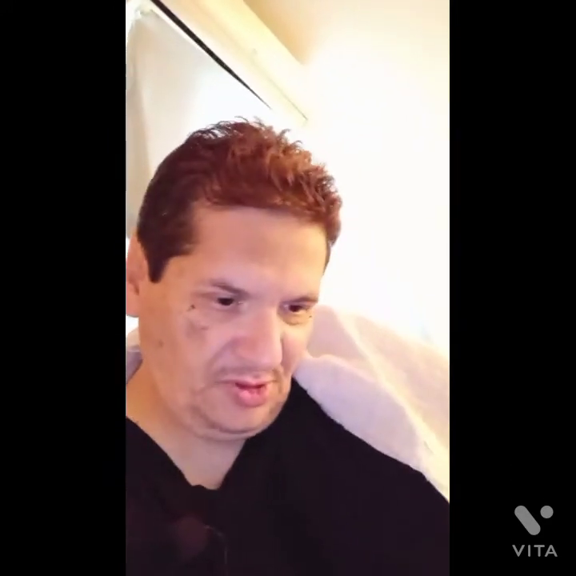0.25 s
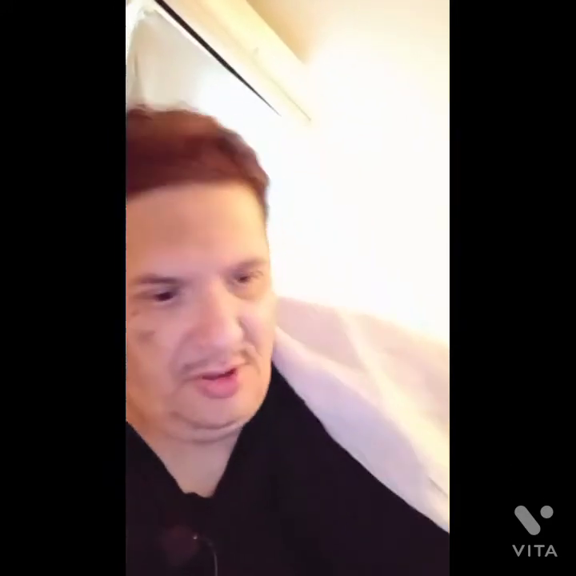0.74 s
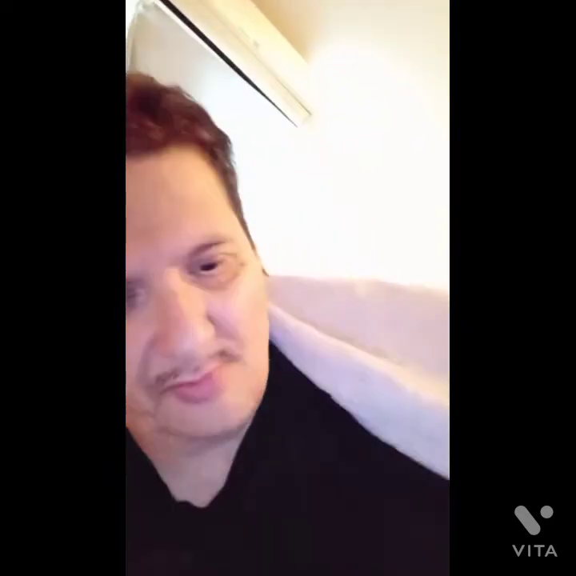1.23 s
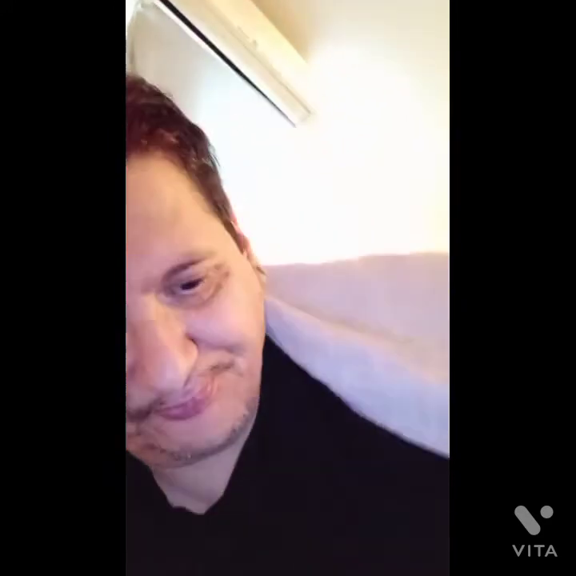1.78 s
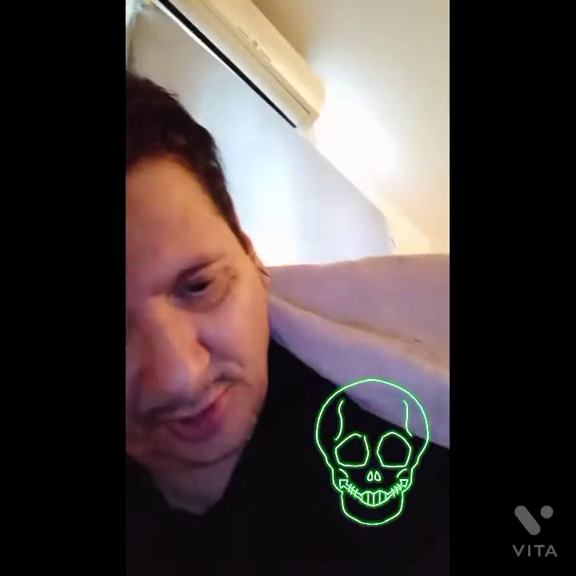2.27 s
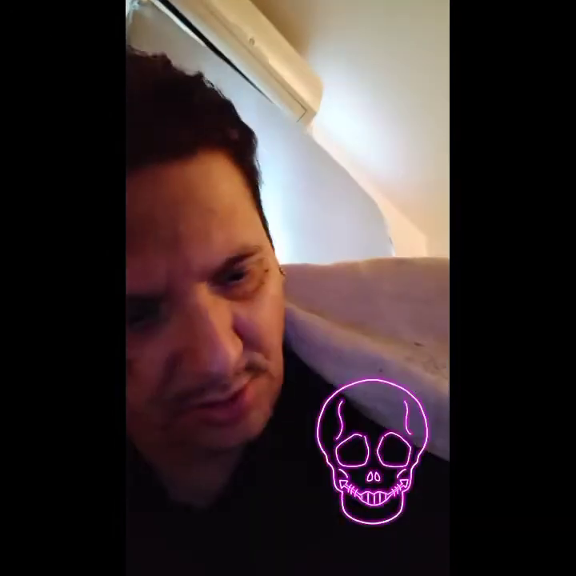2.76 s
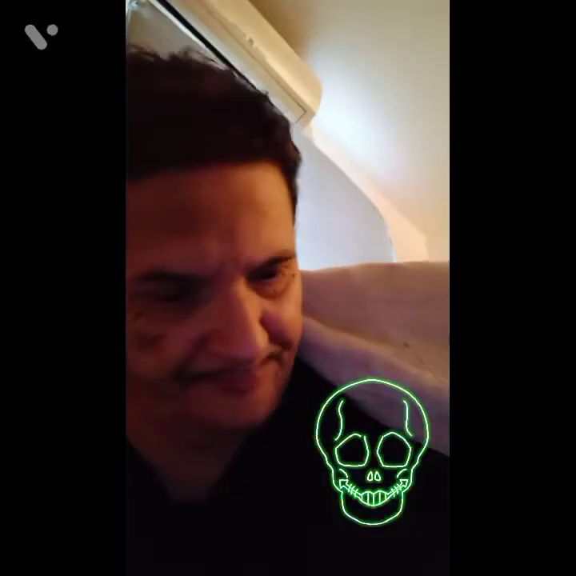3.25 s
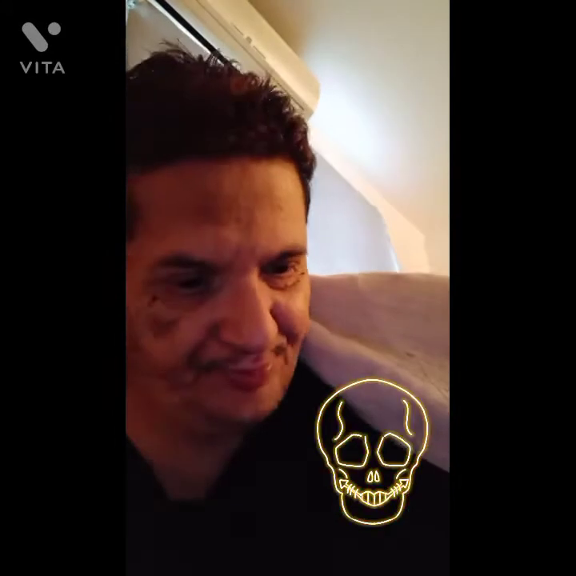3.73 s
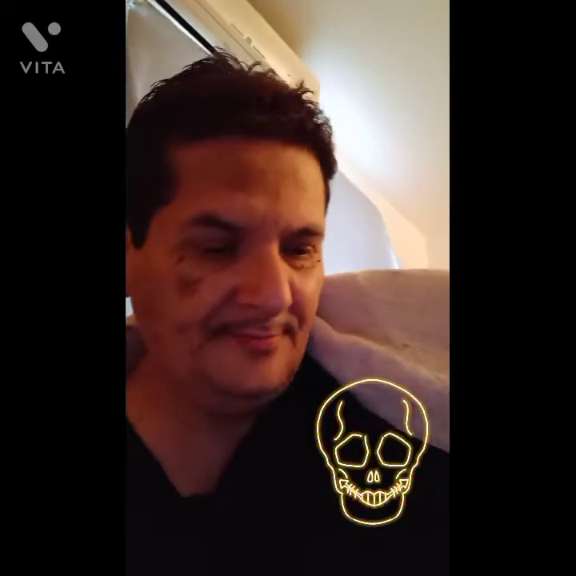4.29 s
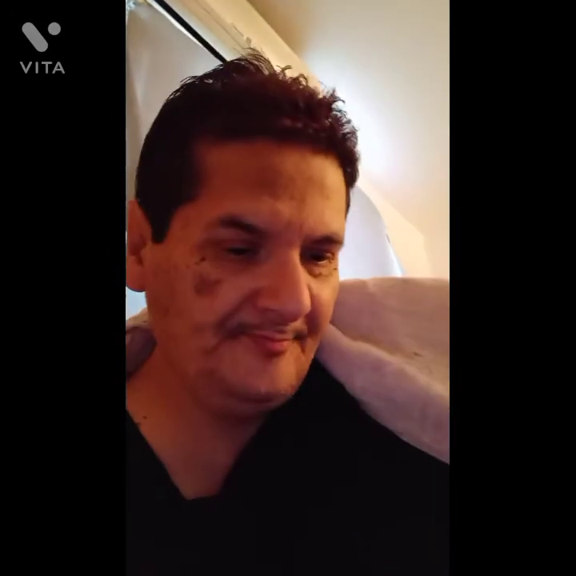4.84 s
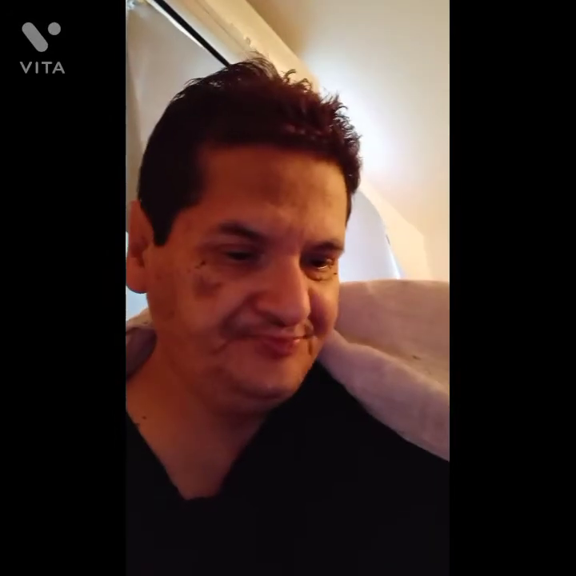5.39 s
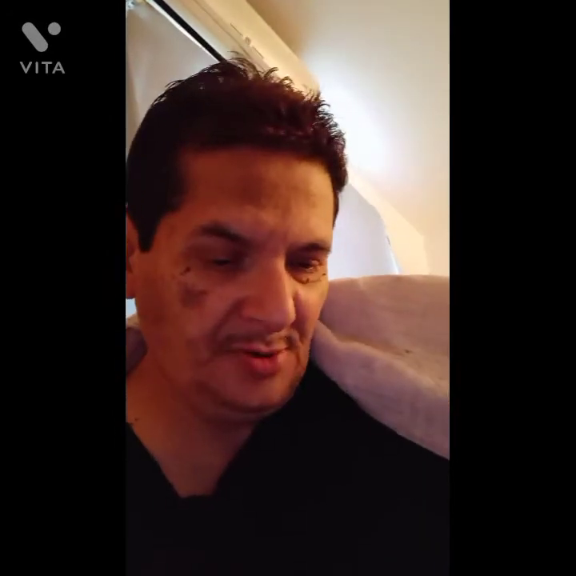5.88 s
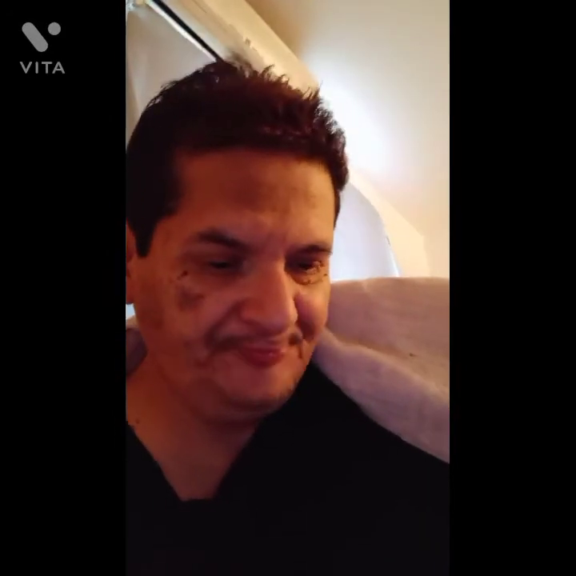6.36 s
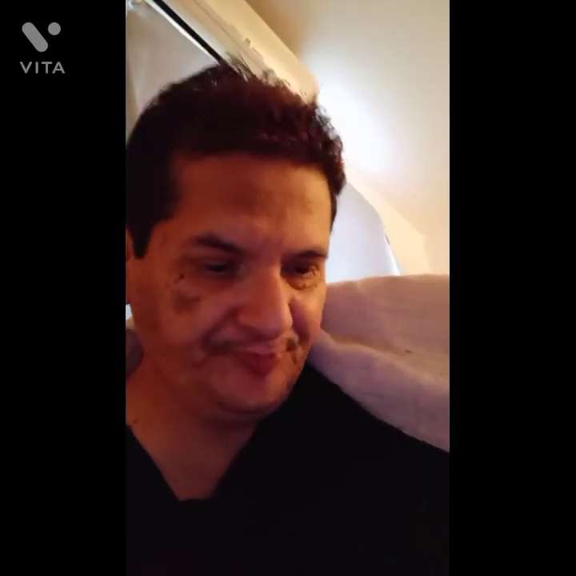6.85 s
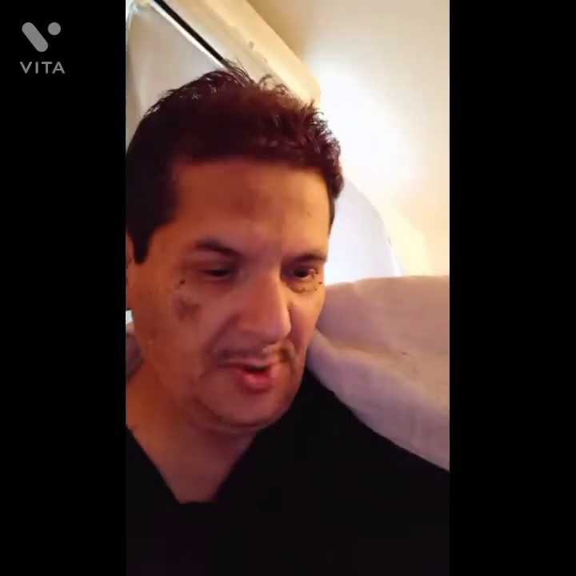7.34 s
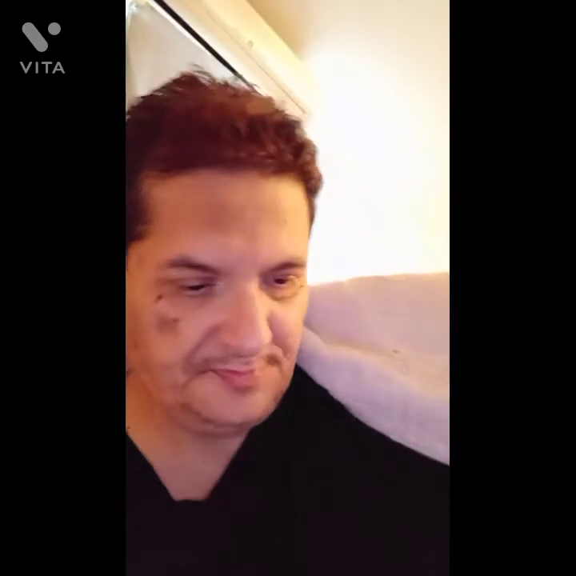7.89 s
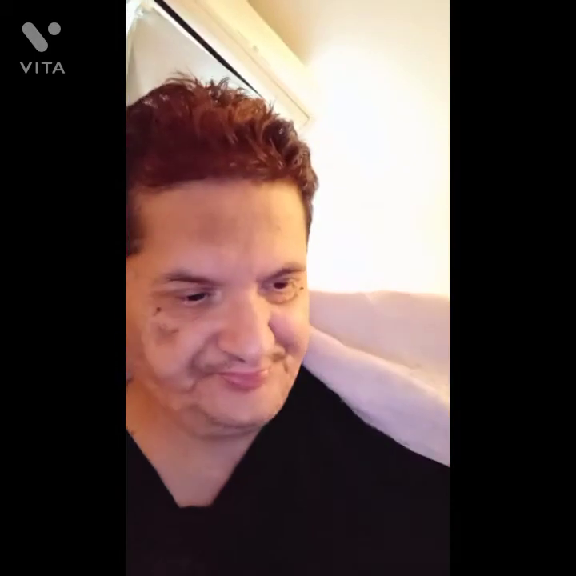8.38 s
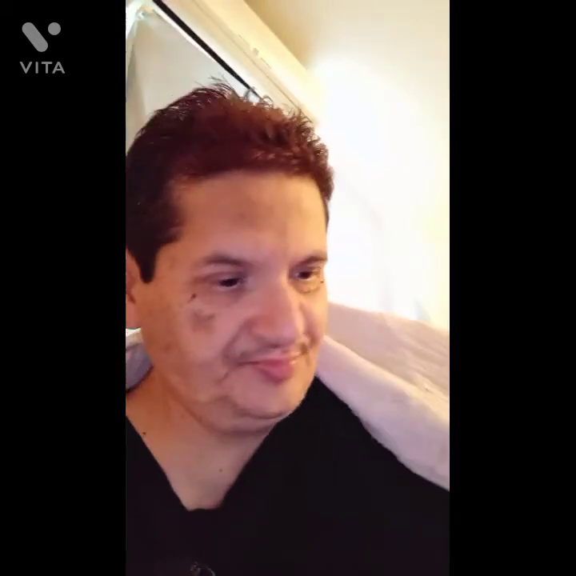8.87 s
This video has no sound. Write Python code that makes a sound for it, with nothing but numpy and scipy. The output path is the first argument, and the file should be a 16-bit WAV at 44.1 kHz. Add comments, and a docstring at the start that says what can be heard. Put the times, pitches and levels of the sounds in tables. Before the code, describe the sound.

A paper envelope is handled and torn open close up, with dry rustles, sharp crease snaps, short fibrous rips and dull finger pops.

```python
"""Tearing open a paper envelope

A paper envelope is torn open by hand, close to a microphone in a quiet, soft room.
Sheets slide and rustle: shaped noise with tiny catches, plus small wrinkles that ring briefly.
Creases snap as short coloured pushes, and the seam rips as bursts of breaking fibres.
Fingers bump the envelope with dull pops, and gliding bands of noise make it sound hollow.
A thin tone whistles in one pause; still air and a short room tail lie behind it all."""
import sys
import numpy as np
from scipy import signal
from scipy.fft import rfft, irfft, next_fast_len
from scipy.io import wavfile
from scipy.ndimage import map_coordinates

SR = 44100
rng = np.random.default_rng(int(sys.argv[2]) if len(sys.argv) > 2 else 0)


def store_pcm(level_fs):
    """Save levels as 16-bit WAV."""
    pcm = np.round(np.clip(level_fs, -1, 1) * 32767).astype(np.int16)
    wavfile.write(sys.argv[1], SR, np.atleast_2d(pcm).T)


N = 402633  # length in samples


def amp(db):
    """Turn decibels into a plain multiplier."""
    return 10 ** (np.asarray(db) / 20)


def unit(x):
    """Scale to rms 1."""
    return x / np.sqrt(np.mean(x ** 2) + 1e-20)


def along(points, hz):
    """Read (Hz, value) points at any frequency, on a log axis."""
    f, v = np.transpose(points)
    return np.interp(np.log(hz + 1), np.log(f + 1), v)


def curves(rows):
    """One value per sample for each column after the time."""
    s, *cols = np.transpose(rows)
    return [np.interp(np.arange(N) / SR, s, c) for c in cols]


def wobble(rate):
    """A smooth random curve through `rate` random points a second."""
    points = rng.standard_normal(int(N * rate / SR) + 4)
    return map_coordinates(points, [np.arange(N) * rate / SR])


def add(track, s, sound):
    """Mix a sound into the track at time s."""
    room_left = track[max(0, round(s * SR)):][:len(sound)]
    room_left += sound[:len(room_left)]


def ring(spectrum, size=4096):
    """How a body with this spectrum answers one tap: nothing before the tap, total energy 1."""
    cepstrum = irfft(np.log(amp(along(spectrum, np.fft.rfftfreq(size, 1 / SR)))))
    # folding the second half onto the first puts the whole answer after the tap
    cepstrum[1:size // 2] *= 2
    cepstrum[size // 2 + 1:] = 0
    response = irfft(np.exp(rfft(cepstrum)))
    return response / np.linalg.norm(response)


def coloured(x, spectrum):
    """Sound x through a body with this spectrum."""
    return signal.fftconvolve(x, ring(spectrum))[:len(x)]


def filtered(x, gain):
    """Multiply x by a gain that depends on frequency."""
    m = next_fast_len(N + SR // 2)
    return irfft(rfft(x, m) * gain(np.fft.rfftfreq(m, 1 / SR)), m)[..., :N]


def breaks(rate, spread_db, size):
    """Clicks at random moments, about `rate` a second, of uneven strength and either sign."""
    strength = amp(spread_db * np.clip(rng.standard_normal(size), -2, 2))
    happens = rng.random(size) < rate / SR
    return happens * strength * rng.choice([-1, 1], size)


def friction(spectrum, rate, spread_db, smooth_db, flutter_db, grip=1):
    """Tiny catches over a smooth rub; a light grip hardly catches at all; rms 1."""
    catches = grip * unit(breaks(rate, spread_db, size=N))
    rub = amp(smooth_db) * rng.standard_normal(N)
    flutter = amp(flutter_db * wobble(60))
    return unit(coloured((catches + rub) * flutter, spectrum))


def shifting_colour(x, width_hz, life_s, depth_db):
    """The colour shifts: random patches of pitch and time grow louder and softer; rms 1."""
    hz, t, z = signal.stft(x, SR, nperseg=1024, noverlap=896)
    row, col = np.meshgrid(hz / width_hz, t / life_s, indexing="ij")
    knots = rng.standard_normal((int(row.max()) + 2, int(col.max()) + 2))
    field = np.clip(map_coordinates(knots, [row, col], order=1), -1.5, 1.5)
    patchy = signal.istft(z * amp(depth_db * field), SR, nperseg=1024, noverlap=896)[1]
    return unit(patchy[:N])


def buckle(t, scatter, t60):
    """One sharp push and the quickly dying shudder after it."""
    push = scatter * rng.standard_normal(len(t)) * amp(-60 * t / t60)
    push[0] = 1
    return push


# tone of the still air: f/Hz, level/dB (per Hz, relative)
AIR_SPECTRUM = [(80, -20.5), (220, 5), (450, -12), (1150, -12), (1280, 17.5), (1500, -22.5), (2050, 1.5),
                (2500, -23.5), (3400, -28), (6500, 2.5), (8600, -13), (9900, 0.5), (11500, -33)]


def still_air(db):
    """A faint steady noise, coloured like the quiet air."""
    return amp(db) * coloured(rng.standard_normal(N), AIR_SPECTRUM)


# light contact, as the sheets never quite rest except for one short pause:
# t/s, hiss level/dB (before the trim in scene)
LIGHT_CONTACT = [(0, -67.5), (0.5, -60), (0.7, -65), (0.9, -62), (1.0, -81), (1.07, -96), (1.2, -63.5),
                 (1.45, -61), (1.53, -55.5), (1.85, -61.5), (2.1, -65), (2.5, -60), (3.4, -56), (4.1, -62),
                 (6.6, -59.5), (6.75, -68.5), (6.95, -71), (7.04, -61), (7.4, -57.5), (7.78, -65),
                 (8.28, -64), (8.57, -62), (8.73, -64), (9.13, -55.5)]
# the hands slide one sheet over another: start t/s, end t/s,
# hiss level/dB, mid rustle level/dB (before the trims in scene)
STROKES = [(0.027, 0.076, -52, -67), (0.346, 0.398, -49, -69), (0.554, 0.624, -54.5, -62),
           (0.744, 0.867, -50, -53), (1.088, 1.12, -49, -49), (1.157, 1.22, -51, -56),
           (1.3, 1.36, -52, -59), (1.58, 1.78, -52.5, -58), (1.928, 2.008, -56, -57.5),
           (2.301, 2.419, -54.5, -57), (2.578, 2.722, -55, -59), (2.786, 2.927, -48.5, -52.5),
           (3, 3.135, -48, -54), (3.59, 3.75, -54.5, -57), (3.828, 4.035, -52, -56.5),
           (4.134, 4.161, -46.5, -55), (4.332, 4.486, -50, -53), (4.525, 4.599, -49.5, -59),
           (4.669, 4.715, -47, -51.5), (4.783, 4.981, -50, -54), (5.04, 5.41, -56.5, -62),
           (5.434, 5.491, -52, -59), (5.55, 5.679, -51, -53.5), (5.769, 5.918, -56, -64.5),
           (5.95, 6.075, -52, -58.5), (6.09, 6.221, -47.5, -59), (6.356, 6.566, -46, -54.5),
           (6.644, 6.694, -44.5, -52.5), (6.777, 6.958, -53, -56.5), (7.453, 7.568, -50, -53.5),
           (7.624, 7.695, -52.5, -54.5), (7.833, 8.047, -50, -58.5), (8.087, 8.2, -48.5, -50)]
STROKE_ATTACK_S, STROKE_RELEASE_S = 0.0082, 0.014  # time for a stroke's speed to change by a factor e
STROKE_ARCH_DB = 1.5  # a stroke is fastest, and loudest, in its middle
TOUCH_MID_DB = -4.5  # mid rustle against hiss in the lightest contact


def sliding():
    """Levels in dB of hiss and mid rustle: every stroke builds, arches and dies over the light contact."""
    t = np.arange(N) / SR
    touch, = curves(LIGHT_CONTACT)
    hiss_power, mid_power = amp(touch) ** 2, amp(touch + TOUCH_MID_DB) ** 2
    for start, end, hiss_db, mid_db in STROKES:
        near = slice(*np.searchsorted(t, [start - .2, end + .2]))
        before = np.maximum(start - t[near], 0) / STROKE_ATTACK_S
        after = np.maximum(t[near] - end, 0) / STROKE_RELEASE_S
        arch = np.sin(np.pi * np.clip((t[near] - start) / (end - start), 0, 1)) - 1
        speed = np.exp(-before - after) * amp(STROKE_ARCH_DB * arch)
        hiss_power[near] += (amp(hiss_db) * speed) ** 2
        mid_power[near] += (amp(mid_db) * speed) ** 2
    return 10 * np.log10(hiss_power), 10 * np.log10(mid_power)


# how far a stroke bends the envelope: t/s, level/dB (added to the flexing of a firm stroke)
BEND = [(0, -21.5), (0.5, -23), (0.7, 10), (2.6, -2), (4.6, -11.5), (4.85, 2.5), (5.8, 2.5), (6.1, -8),
        (8.6, -6)]
# hiss of a firm stroke, the flexing it causes before BEND, dB of flexing per dB of hiss
FIRM_DB, FIRM_FLEX_DB, FLEX_GROWTH = -48, -64.5, 1.45
BUMP_FLEX_DB, SNAP_FLEX_DB = -27, -51  # flexing against a bump's level or a snap's knock level
FLEX_SETTLE_S = 0.052  # the envelope settles by a factor e in this time


def flexing(hiss_level):
    """Level in dB of the flexing: firm strokes bend the envelope, and it settles after each bump and snap."""
    bend, = curves(BEND)
    power = amp(FIRM_FLEX_DB + bend + FLEX_GROWTH * (hiss_level - FIRM_DB)) ** 2
    settle = np.exp(-np.arange(SR // 2) / SR / FLEX_SETTLE_S)
    for events, flex_db in ((BUMPS, BUMP_FLEX_DB), (SNAPS, SNAP_FLEX_DB)):
        for s, db, *_ in events:
            add(power, s, (amp(db + flex_db) * settle) ** 2)
    return 10 * np.log10(power)


# tones of the rustle, each f/Hz, level/dB (per Hz, relative):
# sliding hiss, mid rustle in loud strokes, mid rustle in quiet passages, flexing envelope
HISS = [(2500, -56), (3300, -26), (4600, -19), (5800, -8), (6600, 2), (7300, -7), (8300, -24.5),
        (10000, -25), (11500, -38.5), (14000, -52.5)]
LOUD_RUSTLE = [(300, -10), (900, -10.5), (1350, 3), (2100, 7), (2850, -1.5), (3600, 2.5), (4300, 8),
               (5300, 0), (8000, -12), (12000, -36.5)]
QUIET_RUSTLE = [(300, -17.5), (900, -26.5), (1350, -2.5), (2050, 9.5), (2700, -8), (3300, -14.5),
                (3750, 7.5), (4500, 11.5), (5400, -3), (8000, -27), (12000, -51.5)]
PANEL = [(25, -50.5), (70, 4.5), (130, -1), (250, 4.5), (450, -15.5), (750, -7.5), (1300, -41), (3000, -63)]
LOUD_MID_DB, LOUD_RANGE_DB = -59, 1  # mid level where quiet and loud tones meet, and how gradually
UNEVEN_DB, UNEVEN_PER_S = 2.2, 22  # the grip tightens and slackens: depth, changes per s


def rustle(hiss_level, mid_level, hiss_db, mid_db, flex_db):
    """A hiss, a mid rustle (full when loud, with a gap near 3 kHz when quiet), and flexing underneath."""
    flex_level = flexing(hiss_level)
    grip = np.minimum(amp((hiss_level - FIRM_DB) / 2), 1)
    hiss = friction(HISS, rate=500, spread_db=7, smooth_db=-2, flutter_db=2, grip=grip)
    # fade between the two mid tones by level
    loudness = .5 + .5 * np.tanh((mid_level - LOUD_MID_DB) / (2 * LOUD_RANGE_DB))
    loud = friction(LOUD_RUSTLE, rate=700, spread_db=6, smooth_db=-1, flutter_db=2.5)
    quiet = friction(QUIET_RUSTLE, rate=1500, spread_db=4, smooth_db=0, flutter_db=3)
    mid = np.sqrt(loudness) * loud + np.sqrt(1 - loudness) * quiet
    flex = friction(PANEL, rate=270, spread_db=4, smooth_db=2, flutter_db=2.0)
    hiss = shifting_colour(hiss, width_hz=600, life_s=.04, depth_db=3.5)
    mid = shifting_colour(mid, width_hz=380, life_s=.06, depth_db=6.5)
    flex = shifting_colour(flex, width_hz=110, life_s=.09, depth_db=8)
    layers = ((hiss_level + hiss_db, hiss), (mid_level + mid_db, mid), (flex_level + flex_db, flex))
    return sum(amp(level + UNEVEN_DB * wobble(UNEVEN_PER_S)) * sound for level, sound in layers)


# kinds of small wrinkle: middle f/Hz, typical rate per s in a firm grip,
# typical peak level/dB (over the stroke level it follows)
WRINKLES = [(1760, 18, 4.5), (4360, 45, 5.5), (6530, 50, 6)]


def crinkle(hiss_level, mid_level, spread_db, pitch_spread, cycles):
    """Small wrinkles give in clumps, each ringing briefly, louder and more often in harder strokes."""
    out, t = np.zeros(N), np.arange(SR // 100) / SR
    grip = np.minimum(amp(hiss_level - FIRM_DB), 1)
    followed = (mid_level, mid_level, hiss_level)
    pitch_shares = (2, 1, .5)  # how much of the pitch spread each kind gets
    for (hz, rate, db), level, share in zip(WRINKLES, followed, pitch_shares):
        clumped_rate = rate * grip * np.exp(wobble(16))
        force = breaks(clumped_rate, spread_db, size=N) * amp(level + db)
        for i in np.flatnonzero(force):
            turns = hz * np.exp(share * pitch_spread * rng.standard_normal()) * t
            swell_and_fade = turns / cycles * np.exp(1 - turns / cycles)
            add(out, i / SR, force[i] * swell_and_fade * np.sin(2 * np.pi * turns))
    return out


# creases snapping and spots of the seam letting go: t/s,
# rms level/dB of the hollow knock, of the sheet's ring, of the bright crack
SNAPS = [(0.5386, -39.0, -37, -33.5), (0.7183, -44, -38, -36.5), (0.8676, -58, -46, -40.5),
         (1.0808, -58, -68, -45), (1.2097, -53, -72, -32), (1.5737, -36, -37.5, -37),
         (1.6534, -50.5, -49, -48.5), (1.9309, -52.0, -53, -41.5), (2.0217, -53.5, -75, -45.0),
         (2.3571, -45.5, -59, -49.5), (2.3654, -60, -30, -56), (2.6451, -47.0, -44.5, -39),
         (2.6498, -64, -59, -36.5), (2.6894, -71, -60, -36.0), (2.779, -70, -67, -37),
         (2.7847, -65, -49, -36.5), (2.8327, -41.5, -75, -74), (2.8377, -44, -40.0, -39.0),
         (3.0529, -49.5, -59, -38), (3.5741, -68, -42.5, -36.5), (3.6082, -76, -53, -37.5),
         (3.6309, -59.5, -51.0, -40.5), (3.6437, -74, -58.0, -36.0), (3.9772, -56.5, -44.5, -55),
         (4.0154, -69, -46.0, -48), (4.116, -51, -54.0, -45.5), (4.1785, -51, -65, -39.0),
         (4.195, -53, -64, -45.0), (4.208, -51.0, -67, -46), (4.224, -48, -64, -44.5),
         (4.2371, -48.5, -60, -46), (4.26, -47, -63, -34.5), (4.3486, -66, -62.0, -34.5),
         (4.4144, -51.5, -67, -32.5), (4.7011, -46.5, -45, -40.0), (4.8922, -48, -63, -38.5),
         (4.9713, -45.5, -68, -37.5), (5.1629, -79, -61.0, -37.0), (5.3534, -58, -48, -37),
         (5.4028, -53, -47.5, -45), (5.548, -47.0, -44, -34.5), (5.5587, -54, -50, -40.5),
         (5.5626, -48.5, -38, -34.5), (5.9686, -58.5, -44, -45), (6.493, -69, -58.0, -35),
         (6.6514, -60, -49.0, -46), (6.6554, -60, -42, -30.0), (6.6603, -69, -38.5, -40),
         (6.782, -69, -58.0, -39), (6.8072, -44.5, -57.0, -31), (6.8121, -61.0, -62.0, -34),
         (6.8484, -50.0, -51, -51), (7.0793, -51.5, -68.0, -73), (7.9137, -75, -40, -33),
         (7.9277, -62, -47, -33), (7.9805, -43.0, -43, -33), (7.985, -44, -56, -31),
         (8.0253, -56, -66.0, -43), (8.0867, -77, -68, -41), (8.1701, -45, -46, -38),
         (8.1742, -42.5, -48, -36), (8.1875, -46, -60.0, -39), (8.4296, -46.5, -47.5, -46),
         (8.7894, -49.5, -61, -50.5), (9.058, -49.5, -75, -66), (9.1047, -44.5, -47.5, -42.5)]
# tones of a snap, each f/Hz, level/dB (relative): the sheet around a crease, the stiff patch beside it,
# and breaking fibres (per Hz), which also colour the rips
KNOCK = [(150, -9), (600, -4), (1050, -5), (1750, 2.5), (2200, 1), (3000, -27.5), (9000, -59)]
CREASE_RING = [(1500, -26), (3000, -14.5), (3800, 1.5), (4800, -0.5), (5800, -24.5), (12000, -53.5)]
FIBRES = [(200, -41), (1800, -20), (2800, -26), (4100, -13), (5100, -19), (6000, -1.5), (6650, 3),
          (7300, -5), (8300, -26), (10000, -24.5), (11500, -34), (13900, -41), (15300, -25.5)]


def snaps(scatter, shudder_t60, pitch_spread):
    """A crease flips over: knock, ring and crack, mixed differently at each spot; knock and ring shift pitch."""
    out, t = np.zeros(N), np.arange(SR // 80) / SR
    for s, *levels in SNAPS:
        size = np.exp(pitch_spread * rng.uniform(-1, 1))
        for spectrum, scale, level in zip((KNOCK, CREASE_RING, FIBRES), (size, size, 1), levels):
            shifted = [(hz * scale, gain) for hz, gain in spectrum]
            part = coloured(buckle(t, scatter, shudder_t60), shifted)
            add(out, s, amp(level) * unit(part))
    return out


def stick_slip(depth_db, settle_s):
    """The sheet holds still just before a crease snaps and slides on just after: dB per sample."""
    stall, t = np.zeros(N), np.arange(SR // 8) / SR
    fade = np.exp(-t / settle_s)
    for s, *_ in SNAPS:
        add(stall, s - t[-1], np.concatenate([-fade[::-1], fade / 2]))
    return depth_db * np.clip(stall, -1, 1)


# fingers bumping the envelope: t/s, peak level/dB of the pop (before the trim in scene),
# f/Hz of the flexing panel
BUMPS = [(0.717, -40, 330), (1.083, -37, 283), (1.101, -33, 168), (1.297, -47.5, 503), (1.431, -53.5, 320),
         (1.675, -44.5, 315), (1.93, -36, 212), (2.008, -37, 278), (2.023, -38, 199), (2.234, -46, 424),
         (2.359, -35.5, 380), (2.644, -38.5, 700), (2.832, -30.5, 382), (3.056, -46, 292),
         (4.011, -44.5, 490), (4.249, -43, 240), (4.262, -36.5, 154), (4.7, -33.5, 216), (4.9, -43.5, 527),
         (5.547, -38.5, 560), (6.135, -46, 595), (6.271, -48.5, 209), (6.521, -41.5, 249),
         (6.655, -38, 162), (6.675, -42, 190), (6.847, -50, 179), (7.544, -40, 127), (7.574, -41.5, 586),
         (7.981, -39.5, 119), (8.17, -36.5, 146), (8.188, -39, 130), (8.431, -41, 570), (8.786, -41.5, 202),
         (9.059, -37.5, 286)]


def bumps(db, scatter, shudder_t60, hum_db, hum_t60):
    """A finger pushes a panel of the envelope, which gives with a dull pop and hums briefly."""
    out, t = np.zeros(N), np.arange(SR // 4) / SR
    for s, level, hz in BUMPS:
        panel = [(25, -36), (hz * 0.25, -9), (hz, 0), (hz * 1.54, -7),
                 (1500, -25), (3000, -45), (12000, -75)]
        pop = coloured(buckle(t, scatter, shudder_t60), panel)
        hum = amp(hum_db - 60 * t / hum_t60) * np.sin(2 * np.pi * hz * t)
        add(out, s, amp(level + db) * (pop / np.abs(pop).max() + hum))
    return out


# a faint, thin tone in the pause: t/s, level/dB (before its flutter)
WHISTLE = [(0.88, -66), (0.945, -63), (0.99, -68), (1.08, -69)]
# its partials, from the lowest up: level/dB (relative)
OVERTONES = [0, -14.5, -30]
WHISTLE_HZ = 910  # middle pitch


def whistle(waver_hz, flutter_db):
    """A thin, slightly unsteady tone with weak overtones."""
    db, = curves(WHISTLE)
    t = np.arange(N) / SR
    first, last = WHISTLE[0][0], WHISTLE[-1][0]
    gate = np.clip(np.minimum(t - first, last - t) / STROKE_ATTACK_S, 0, 1)
    phase = 2 * np.pi * np.cumsum(WHISTLE_HZ + waver_hz * wobble(120)) / SR
    tone = sum(amp(level) * np.sin(k * phase) for k, level in enumerate(OVERTONES, 1))
    return gate * amp(db + flutter_db * wobble(76)) * unit(tone)


# pulls along the seam: start t/s, end t/s, level/dB (before the trim in scene), fibre breaks per s
RIPS = [(1.079, 1.103, -46, 1800), (1.174, 1.201, -46, 6200), (2.598, 2.624, -45.5, 1800),
        (2.639, 2.724, -46.5, 130), (2.784, 2.851, -50, 200), (3.6, 3.701, -47, 130),
        (4.315, 4.377, -49, 2500), (4.381, 4.427, -39, 340), (4.419, 4.478, -45.5, 410),
        (4.846, 4.878, -41.5, 600), (4.955, 4.98, -43.5, 680), (5.123, 5.166, -46.5, 550),
        (5.225, 5.374, -43, 284), (5.954, 6.038, -40, 385), (6.097, 6.165, -37, 1700),
        (6.65, 6.67, -35.5, 3000), (6.661, 6.692, -47.5, 1400), (6.788, 6.803, -39, 1700),
        (6.803, 6.846, -37.5, 1500), (7.974, 7.995, -42, 2400), (8.16, 8.187, -37, 1460)]
CLUMPS_PER_S = 140  # how often the tear catches and runs on


def rips(spread_db, fuzz_db, swell, db, clump_db):
    """The tear runs in fits: bundles of fibres part in clumps over a fuzz of single fibres."""
    force = np.zeros(N)
    for start, end, level, rate in RIPS:
        n = max(200, round((end - start) * SR))
        pull = np.abs(np.sin(np.linspace(0, np.pi, n))) ** swell
        knots = np.arange(n) / SR * CLUMPS_PER_S
        fits = amp(clump_db * map_coordinates(rng.uniform(-1, 1, int(knots[-1]) + 3), [knots]))
        bundles = unit(breaks(rate, spread_db, size=n))
        fuzz = amp(fuzz_db) * rng.standard_normal(n)
        add(force, start, amp(level + db) * unit((bundles + fuzz) * pull * fits))
    tear = coloured(force, FIBRES)
    return tear.std() * shifting_colour(tear, width_hz=900, life_s=.025, depth_db=3.5)


# soft hollow resonances as the envelope is handled: start t/s, end t/s, start f/Hz, end f/Hz,
# width f/Hz, level/dB (before the trim in scene)
HOLLOW = [(2.692, 2.796, 990, 932, 111, -68), (3.444, 3.57, 1040, 960, 170, -66),
          (3.83, 3.915, 377, 432, 131, -68), (4.267, 4.335, 467, 445, 200, -61.5),
          (4.786, 4.833, 195, 174, 152, -56), (5.199, 5.243, 250, 215, 193, -60),
          (5.358, 5.54, 298, 213, 109, -71), (5.63, 5.79, 680, 616, 380, -68),
          (5.723, 5.795, 341, 278, 167, -59), (6.258, 6.523, 588, 665, 88, -76),
          (6.922, 7.105, 264.5, 248, 129.4, -71.5), (7.94, 8.27, 152, 127.7, 69.7, -68),
          (7.37, 7.53, 460, 441, 258, -73)]


def hollow(db):
    """Narrow bands of noise swell, glide and fade."""
    out = np.zeros(N)
    for start, end, start_hz, end_hz, width_hz, level in HOLLOW:
        u = np.linspace(0, 1, max(200, round((end - start) * SR)))
        knots = u * (end - start) * width_hz  # faster flutter makes a wider band
        flutter = [map_coordinates(rng.standard_normal(int(knots[-1]) + 4), [knots]) for _ in range(2)]
        phase = 2 * np.pi * np.cumsum(start_hz + (end_hz - start_hz) * u) / SR
        band = flutter[0] * np.cos(phase) + flutter[1] * np.sin(phase)
        swell = np.sqrt(np.abs(np.sin(np.pi * u)))
        add(out, start, amp(level + db) * unit(band * swell))
    return out


# time for the room tail to fall by 60 dB: f/Hz, time t/s
ROOM_T60 = [(150, 0.28), (3000, 0.13), (10000, 0.12)]
# what the soft room sends back: f/Hz, level/dB (before the room level in scene)
WALLS = [(250, -0.5), (2000, -4), (6000, -9)]


def room(x):
    """A short, dull tail of fading noise in which the treble dies first."""
    hz, t, z = signal.stft(rng.standard_normal(SR // 2), SR, nperseg=256)
    fade = amp(-60 * t / along(ROOM_T60, hz)[:, None])
    tail = signal.istft(z * fade, SR, nperseg=256)[1]
    late = np.pad(x, (SR // 200, 0))  # the walls answer 5 ms later
    wet = signal.fftconvolve(late, tail / np.linalg.norm(tail))[:N]
    return filtered(wet, lambda f: amp(along(WALLS, f)))


def scene():
    """Paper close by, its soft answer from the walls, and still air."""
    levels = sliding()
    paper = rustle(*levels, hiss_db=1.5, mid_db=0, flex_db=2.5)
    paper = paper + crinkle(*levels, spread_db=6, pitch_spread=.1, cycles=.8)
    paper = paper * amp(stick_slip(depth_db=0.5, settle_s=0.029))
    paper = paper + snaps(scatter=.16, shudder_t60=.014, pitch_spread=.06)
    paper = paper + bumps(db=-0.5, scatter=0.13, shudder_t60=0.053, hum_db=-8.5, hum_t60=0.065)
    paper = paper + whistle(waver_hz=18, flutter_db=3)
    # spread_db: how much the strengths of fibre bundles differ
    paper = paper + rips(spread_db=6.5, fuzz_db=-6.5, swell=0.14, db=5.0, clump_db=5.5)
    paper = paper + hollow(db=0.5)
    return (paper + amp(-11.5) * room(paper) + still_air(db=-77.0))[None]


def record(dry, low_hz=50, top_hz=16000):
    """The small microphone loses the deep bass; nothing is kept above the band limit."""
    thin = signal.sosfilt(signal.butter(3, low_hz, "highpass", fs=SR, output="sos"), dry)
    return filtered(thin, lambda hz: hz < top_hz)


dry = scene()
out = record(dry)
store_pcm(out)
```